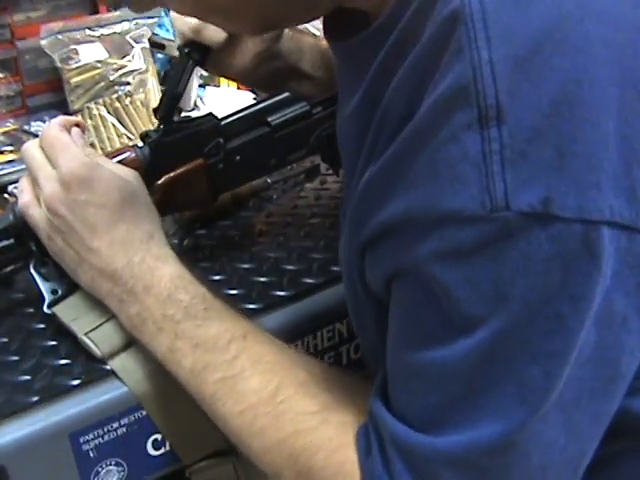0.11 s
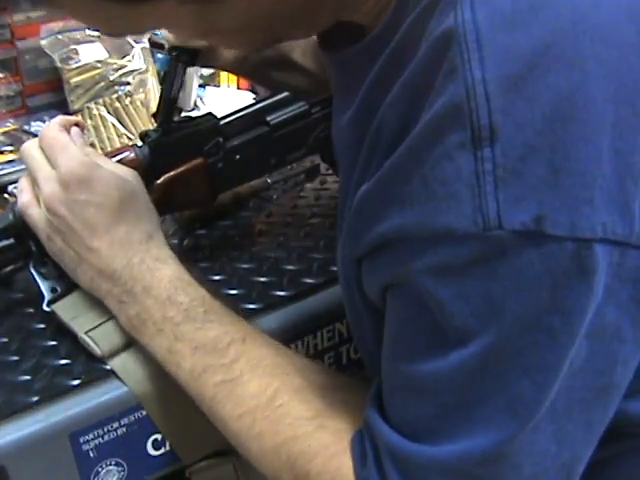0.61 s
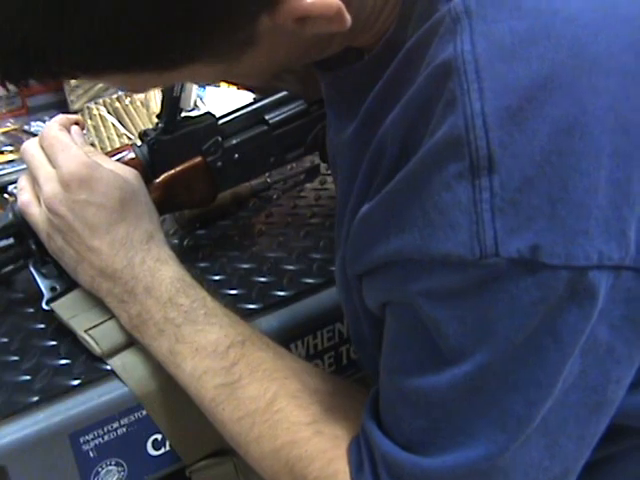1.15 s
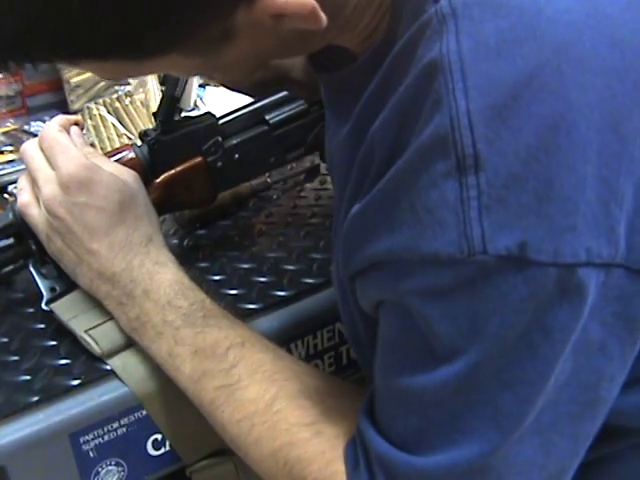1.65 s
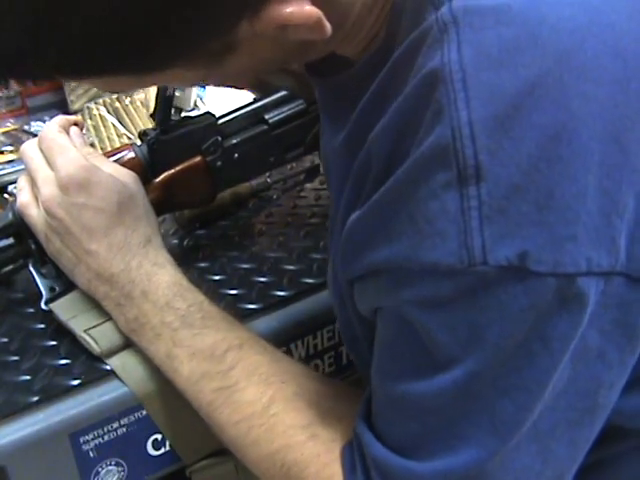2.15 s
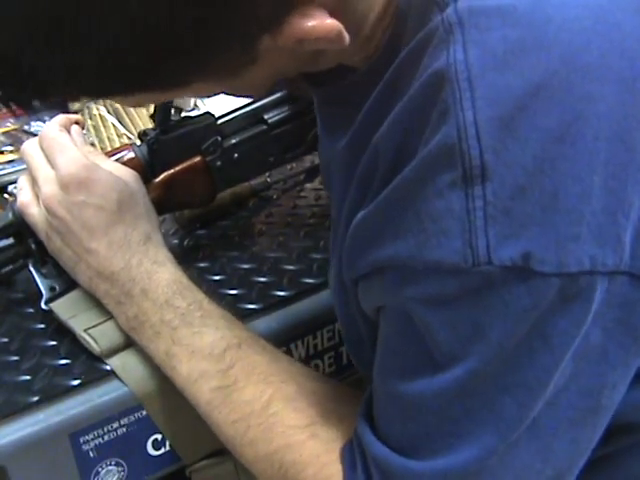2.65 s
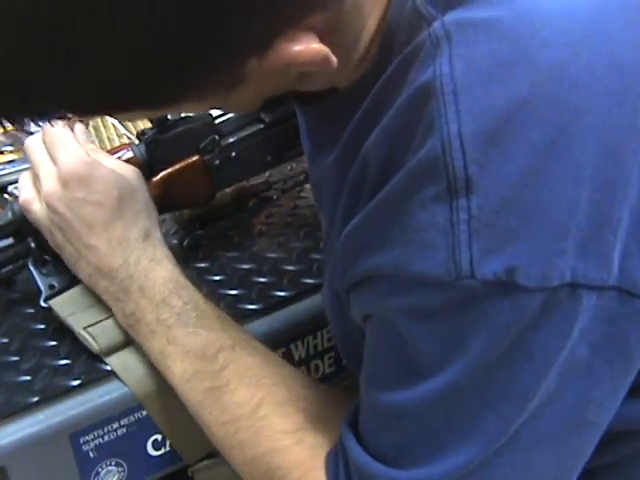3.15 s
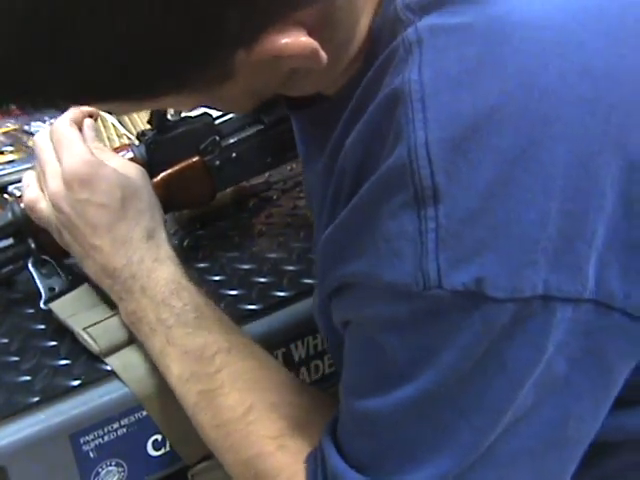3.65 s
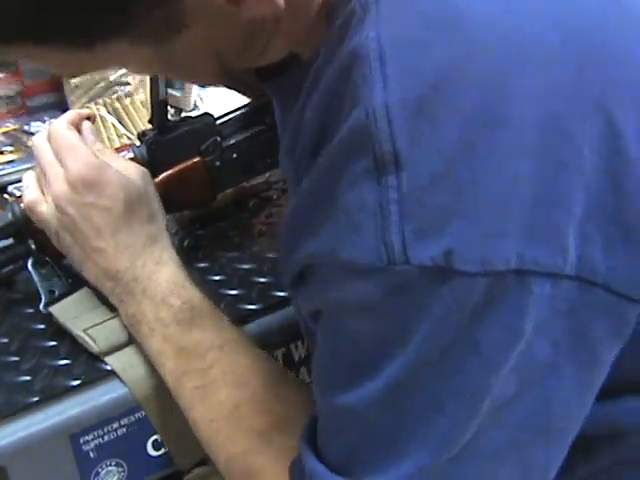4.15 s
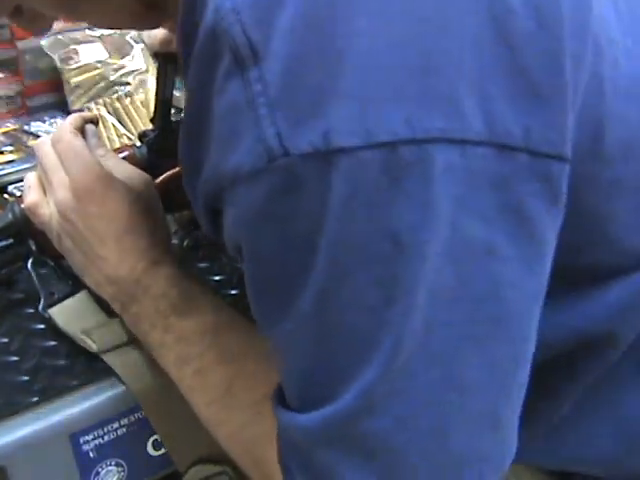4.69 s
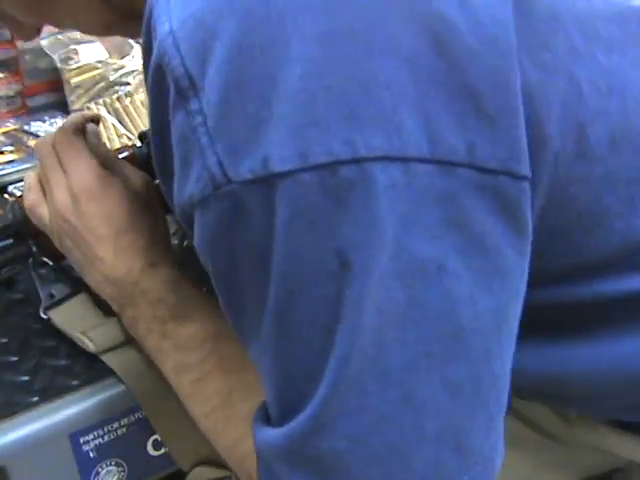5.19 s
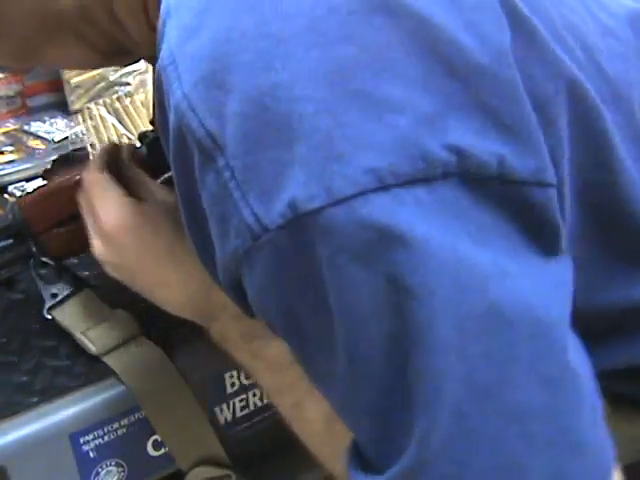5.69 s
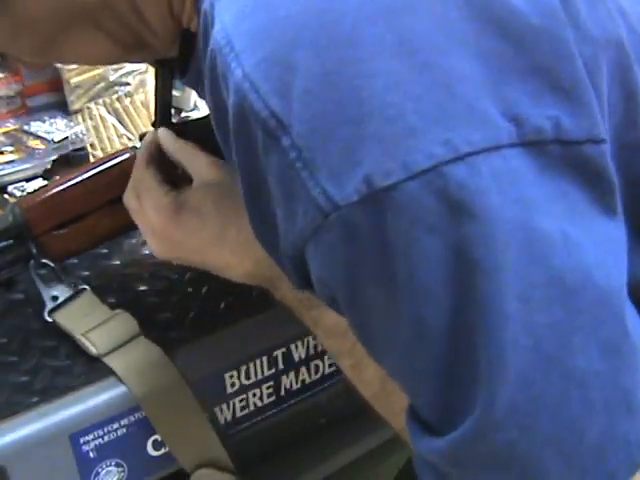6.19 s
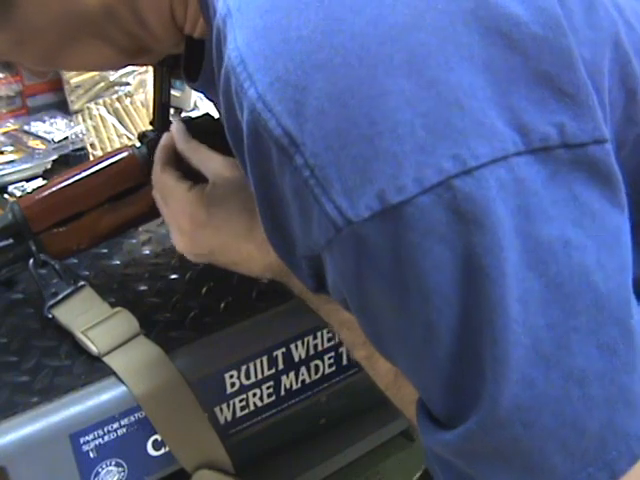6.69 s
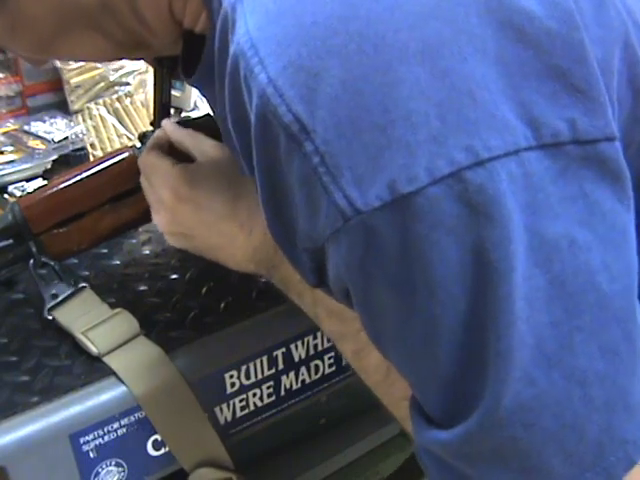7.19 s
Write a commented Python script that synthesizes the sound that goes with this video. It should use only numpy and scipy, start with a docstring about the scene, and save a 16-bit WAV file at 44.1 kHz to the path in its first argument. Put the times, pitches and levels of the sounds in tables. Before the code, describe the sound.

Small, dry metallic clicks come first, slightly left of centre, with a short squeak and bright pings. Soft scuffing nudges follow, then firmer bumps as heavy steel is slid across the bench in patchy, gritty strokes. One hard clack with fast rebounds is the loudest moment, leaving a short room tail. A few tiny clicks end it, over constant hiss, low hum and a thin early whine.

```python
"""A steel pin ticks, squeaks and scrapes in a sprung mount on a workbench: gritty noise bursts ring its damped modes,
and rough sines sound single modes as short pings and longer squeaks.
The heavy assembly is then dragged over the mat as patchy coloured noise, bumps the bench with decaying low tones
and ringing steel, and drops shut with a clack and quick rebounds. A small hard room answers with a fading noise
tail. Far off a machine hums in wavering tones beside a thin whine, over steady stereo hiss and a slow low sway."""
import sys
import numpy as np
from scipy import signal
from scipy.fft import rfft, irfft, next_fast_len
from scipy.io import wavfile
from scipy.ndimage import uniform_filter1d, map_coordinates

SR = 44100
rng = np.random.default_rng(int(sys.argv[2]) if len(sys.argv) > 2 else 0)


def to_wav(sig):
    """Store sig (one row per channel, or 1-D mono) as 16-bit WAV at the path in sys.argv[1].

    Samples outside -1..1 are clipped; the rate is SR.
    """
    pcm = np.clip(np.atleast_2d(sig), -1, 1) * 32767
    pcm = np.round(pcm).astype(np.int16)
    wavfile.write(sys.argv[1], SR, pcm.T)  # frames by channels


def invert_db(x):
    """Field ratio 10**(x/20) for x, a level in decibels (scalar or array-like)."""
    u = np.asarray(x, float) / 20
    return 10 ** u


N = 322793  # length in samples

# Steady hiss colour. Each row: frequency in Hz, relative level in dB per Hz.
HISS_COLOUR = [(15, -33), (25, -17), (76, -2), (292, -3), (343, -3.5), (529, -4.5), (984, -3), (1400, -4),
               (1830, -6), (2150, -11.5), (4840, -16.5), (5250, -16), (5700, -17), (13200, -21),
               (15900, -21)]
# Stereo likeness of the hiss. Each row: frequency in Hz, left-right likeness (1 same, 0 unrelated, -1 opposed).
HISS_LIKENESS = [(60, 1), (150, 0.7), (380, -0.53), (950, -0.75), (2380, -1.05), (5980, 0.1444),
                 (15000, 0.7)]
# Far machine tones. Each row: frequency in Hz, level in dB rms, depth of waver in dB.
MACHINE_TONES = [(84, -70, 2), (349, -76, 4.5)]
# Close tones of a thin whine. Each row: frequency in Hz, level in dB rms.
WHINE_TONES = [(5228, -82), (5268, -82), (5308, -84)]
# The slow low sway. Each row: time in seconds, level in dB.
SWAY_LEVEL = [(0, -85), (1.15, -75), (1.3, -62.5), (1.5, -70.5), (2.7, -80.5), (4.2, -69), (5.2, -66),
              (7.3, -84)]
# Decay of the room. Each row: frequency in Hz, time to fall by 60 dB in seconds.
ROOM_DECAY = [(100, 0.52), (500, 0.32), (2000, 0.36), (6000, 0.31), (14000, 0.12)]
# Stereo likeness of the room. Each row: frequency in Hz, left-right likeness.
ROOM_LIKENESS = [(60, 1), (180, 0.95), (550, 0.6), (1650, 0.3), (4970, 0.9619), (15000, 0.31)]
# Modes of the bench top. Each row: frequency in Hz, width in Hz, relative level in dB.
BENCH_MODES = [(96, 87, -10), (156, 65, 2.5), (270, 99, 1), (420, 102, 0.5), (721.28, 275, -6.5),
               (1086, 210, -11)]
# Modes of the steel assembly off the mat. Each row: frequency in Hz, width in Hz, relative level in dB.
ASSEMBLY_MODES = [(830, 57, -22), (1080, 50, 4.5), (1500, 280, -0.5), (1900, 112, 11), (2260, 150, 7.5),
                  (2524, 122, 11.5), (2900, 164, 8), (3260, 230, 6), (4080, 440, 2.5), (4260, 140, 5.5),
                  (4720, 230, -4.5), (7500, 56, 5), (6716, 83.7, -14), (8300, 64, 13), (8130, 50, 2),
                  (8600, 255, -6), (15170, 900, -18)]
# Hands, cloth and steel sliding. Each row: time in seconds, rub level in dB, bench rumble level in dB,
# treble level of the rub in dB.
DRAG_LEVELS = [(0, -56.5, -63, -35), (.3, -66.5, -66.5, -2), (2, -65, -66, -12.5), (2.6, -66, -68.5, -1.5),
               (3.46, -61.5, -66.5, -0.5), (3.95, -62, -62.5, 2), (4.11, -60, -57, 8),
               (4.24, -51, -52, 1.5), (4.32, -49, -57, 5.5), (4.4, -48.5, -59, 3), (4.55, -47.5, -59, -4.5),
               (4.73, -47, -60, -4), (4.86, -45.5, -76, -5), (5, -46, -56.5, 0.5), (5.06, -43.5, -46, -0.5),
               (5.16, -46.5, -55.5, 2), (5.26, -42, -49, -4.5), (5.35, -50, -51.5, 2.5),
               (5.45, -44.5, -65, -3), (5.51, -50, -57.5, -3.5), (5.59, -47.5, -62, -1),
               (5.72, -49.5, -59, 3), (5.87, -54.5, -61, 4), (6.18, -52.5, -62, 0), (6.25, -30, -57, 4),
               (6.35, -47, -67, -0.5), (6.42, -51, -56, 0), (6.48, -46.5, -79, 1), (6.53, -48.5, -58.5, 1),
               (6.61, -61, -62, 3), (6.86, -60.5, -64, -0.5), (7.32, -66, -64.5, 10.5)]
# Colour of the rub. Each row: frequency in Hz, relative level in dB per Hz.
RUB_COLOUR = [(180, 2.5), (300, -5.5), (612, -0.5), (798, -2.5), (1080, -0.5), (1170, -3), (1920, -1.5),
              (3730, -6), (6350, -8), (8300, -14.5), (10800, -19), (15800, -31)]
# Stereo likeness of the rub. Each row: frequency in Hz, left-right likeness.
RUB_LIKENESS = [(60, 1), (180, 0.68), (550, 0.37), (1650, 0.4), (4970, 0.85), (15000, 0.61)]
# Broad colour of a blow on the assembly. Each row: frequency in Hz, relative level in dB per Hz.
BLOW_COLOUR = [(290, -36.5), (500, -5), (829, 2.5), (972, -5.5), (2210, 1.5), (3500, -5.5), (4600, -5),
               (6000, -10), (7670, 5.5), (15800, -23)]
# Bumps on the bench. Each row: start in seconds, thud level in dB, rattle in dB over the thud, thud pitch in Hz,
# contact length in seconds, which each layer of the blow scales.
BENCH_BUMPS = [(3.675, -41.5, -23, 253, 0.0057), (3.769, -42.5, 0, 96, 0.043),
               (3.956, -49, -23, 166, 0.036), (4.098, -44, -10, 440.5, 0.054),
               (4.28, -31, -2.5, 441, 0.016), (4.428, -39.5, -3, 102, 0.03), (4.43, -44, -22, 296, 0.0063),
               (4.572, -50, 13.5, 270, 0.0085), (4.662, -34.5, 3.5, 156, 0.022), (4.7, -54, 9, 200, 0.022),
               (4.663, -37, -23, 330, 0.0074), (4.785, -63.5, 12, 226, 0.0093),
               (4.815, -41, -10, 156, 0.024), (4.816, -39.5, -13, 412.3, 0.019),
               (4.888, -34.5, 12.5, 220.9, 0.0064), (4.895, -24.5, -5, 400, 0.0094),
               (4.91, -32.5, 7, 282, 0.0091), (4.967, -37, -3.5, 156, 0.032),
               (5.099, -40, -14, 140.5, 0.067), (5.158, -46.5, 6.5, 155, 0.035),
               (5.203, -39.5, -2, 160, 0.058), (5.352, -44.5, 0.5, 136, 0.053),
               (5.675, -47, 0, 86.26, 0.033), (5.799, -47, -19, 107.3, 0.025)]
# The assembly drops shut and rebounds, steel on steel. Each row: as for the bumps.
CLACK_BLOWS = [(6.191, -18.5, 5.5, 270, 0.013), (6.202, -31, -15, 224, 0.015),
               (6.212, -19.5, -11, 180, 0.012), (6.218, -31, 15, 260, 0.0044),
               (6.233, -43, 10, 240, 0.00858), (6.247, -36.5, 11, 198, 0.023), (6.27, -44, 6, 202, 0.014),
               (6.287, -37, 4, 296, 0.013), (6.312, -48, 12, 248, 0.01962), (6.36, -49, 8, 219.3, 0.01766)]
# Pin contacts. Each row: start in seconds, level of the low modes in dB,
# then body, middle and high modes in dB over the low ones.
PIN_TICKS = [(0.2008, -39, -1, -26, -31), (0.2347, -47, 2.5, -24, -20), (0.2763, -31, -17, -11, -22),
             (0.2916, -49.5, 10, 11, -11), (0.2998, -53, -17, 13, -4), (0.31, -40.5, -4.5, -5, -20),
             (0.7384, -52.5, 4.5, -1, -8), (0.9286, -44, -19, -11.5, -19.5), (0.9363, -38, -20, 0, -16),
             (.943, -50.5, -8, 15.5, -6), (0.9492, -49, -23, 16.5, 16), (0.9555, -51.5, 9.5, 3, 18),
             (1.4607, -40, -24, 4, -10.5), (1.4714, -39.5, -1, 5, 0), (1.637, -52, -1, 8, -10),
             (1.65, -52, 5, 2.5, -10), (1.667, -48, -6, 5, -11), (1.8454, -49.5, -1, 4, 0),
             (1.8535, -42.5, 1.5, 4, -2), (1.8734, -44.5, 5.5, 10, 1), (2.1436, -43, -9, 2.5, -10),
             (2.149, -42.5, -14, 6.5, 3), (2.159, -46.5, 2.5, -2, -1), (2.215, -48.5, -3.5, 5, -1),
             (2.8868, -51.5, -8, -4, -16), (2.917, -53, -12, -5, -17), (3.0406, -52.5, -13, 1, -8),
             (3.2256, -57.5, -3, 10, -5), (3.3018, -50.5, -18, -6, -17), (3.3687, -51.5, -13, -2, -7),
             (3.477, -49.5, -11, -6, -7), (3.4988, -46, -12, -2, -7), (3.5464, -45, -15, -5, -9),
             (3.5644, -45.5, -8, -3.5, -10), (3.7184, -45.5, -10, -7, -13), (3.7675, -41.5, -8, -5.5, -14),
             (4.3993, -42, -20, -8, -8), (4.5725, -40, -4, -20, -30), (6.0306, -44, -5, -8.5, -20.5),
             (6.0603, -38, -16.5, 1.5, -22), (6.068, -46, -10, 4, -20), (6.452, -51, -12, -1, 3),
             (6.472, -52, -10, 3, 5), (6.572, -49, -18, 9, 6.5), (6.5835, -43.5, -17, 7.5, 3),
             (6.606, -51, -19, 18, 12.5), (7.0707, -49.5, -17.5, 6, -10), (7.1171, -50, -3, 15.5, 8),
             (7.1274, -54, -9, 15.5, -11), (7.2594, -39, -23, 6.5, -4), (7.2704, -63, -15, -5, -1)]
# Modes of the free pin and its mount. Each row: frequency in Hz, width in Hz, relative level in dB.
FREE_MODES = [(381, 42.78, 6), (752, 80, 8.5), (1110, 980, -4.5), (1736, 330, 4), (2260, 170, 9.5),
              (2860, 1628, 2), (3320, 95, 13.5), (3394, 150, 5), (4760, 310, 6), (5550, 87, 11),
              (5950, 82.7, 10), (6221, 4700, 3), (6770, 450, 8.5), (7240, 160, -4), (8200, 210, 7),
              (9933.2, 69, 13), (11940, 250, -3), (11900, 14000, -26.5)]
# Modes of the gripped pin, damped and shifted. Each row: frequency in Hz, width in Hz, relative level in dB.
GRIPPED_MODES = [(452, 260, -3), (900, 260, 0), (1745, 250, 8), (2462.6, 290, 0), (3740, 560, 4),
                 (4300, 1200, -2.5), (5430, 340, 3.5), (7357.7, 1178, 2), (8700, 299, 5), (9200, 1668, 0),
                 (11300, 1400, 1.5), (15000, 1214, -1.5)]
# Mode groups low, body, middle and high. First row: bottoms in Hz; second row: tops in Hz.
MODE_GROUPS = [1400, 0, 4200, 8600], [4200, 1400, 8600, 22000]
# Single pin modes sounding alone: short pings at a contact, and longer squeaks from rubs.
# Each row: start in seconds, pitch in Hz, level in dB before swell and fade, swell in seconds, fade in seconds.
SINGLE_MODES = [(.118, 3380, -42.5, .04, .027), (.201, 3150, -39, .0007, .002),
                (.125, 1760, -40.5, .036, .03), (.202, 1700, -38, .001, .0035),
                (.138, 9900, -56.5, .03, .07), (.16, 3380, -43, .003, .006), (.3, 9800, -35, .0007, .0045),
                (.94, 3280, -48, .006, .035), (.95, 14880, -43, .003, .02), (4.1, 3790, -40, .014, .015),
                (6.062, 2045, -42, .003, .022), (6.061, 4680, -45, .002, .02),
                (7.259, 1770, -42, .0031, .0021)]
# Lead of the left side over the right for near sound. Each row: frequency in Hz, phase in radians.
LEFT_LEAD = [(100, 0.1945), (500, 0.5434), (1200, 1.2), (2400, 0.78), (5000, 0.78), (9000, 0.11),
             (12000, 1.6), (16000, 1.61)]

BRIGHT_HZ = 3500  # above this the rub and the blows have a treble layer of their own


def unit(x):
    """Scales to rms 1."""
    return x / np.sqrt(np.mean(x ** 2) + 1e-20)


def along(points, hz):
    """Reads (Hz, value) points on a log frequency axis."""
    f, v = np.transpose(points)
    return np.interp(np.log(hz + 1), np.log(f + 1), v)


def curves(rows):
    """Gives one value per sample for each column after the time."""
    s, *cols = np.transpose(rows)
    return [np.interp(np.arange(N) / SR, s, c) for c in cols]


def wobble(rate):
    """Draws a smooth random curve with rate knots a second."""
    knots = rng.standard_normal(int(N * rate / SR) + 4)
    return map_coordinates(knots, [np.arange(N) * rate / SR])


def filtered(x, response):
    """Multiplies the spectrum of x by a complex response of frequency."""
    m = next_fast_len(N + SR // 2)
    return irfft(rfft(x, m) * response(np.fft.rfftfreq(m, 1 / SR)), m)[..., :N]


def ringing(modes, broad=lambda hz: 0 * hz):
    """Response of damped modes plus a broad part, passing white noise at unchanged power."""
    def response(hz):
        total = broad(hz)
        for k, (centre, width, db) in enumerate(modes):
            damping = 1j * hz * width
            # neighbouring modes swing in opposite senses
            total = total + (-1) ** k * invert_db(db) * damping / (centre ** 2 - hz ** 2 + damping)
        return total / np.sqrt(np.mean(np.abs(total) ** 2))
    return response


def spread(pair, alike):
    """Mixes two unrelated signals into left and right of the given likeness."""
    def shares(hz):
        turn = np.arccos(np.clip(along(alike, hz), -1, 1)) / 2
        return np.array([np.cos(turn), np.sin(turn)])
    mid, side = filtered(pair, shares)
    return np.array([mid + side, mid - side])


def contacts(times, levels_db, lengths, rise, grit_db):
    """Gritty noise bursts of set energy: each swells fast and dies within its contact length."""
    out, t = np.zeros(N + SR), np.arange(SR // 4) / SR
    grit = invert_db(grit_db * wobble(600)) * rng.standard_normal(N)
    grit = np.pad(grit, (0, SR), "wrap")
    for s, db, length in zip(times, levels_db, lengths):
        start = round(s * SR)
        shape = np.exp(-t / max(length, .001)) * (1 - np.exp(-t / rise))
        burst = shape * grit[start:][:len(t)]
        out[start:][:len(t)] += invert_db(db) * burst * np.linalg.norm(shape) / np.linalg.norm(burst)
    return out[:N]


def hiss():
    """Steady coloured noise, partly alike on the two sides."""
    noise = filtered(rng.standard_normal((2, N)), lambda hz: invert_db(along(HISS_COLOUR, hz)))
    return invert_db(-57.5) * unit(spread(noise, HISS_LIKENESS))


def wavering_tone(hz, level_db, phase_waver):
    """A sine whose level (dB, a number or a curve) and phase (radians) drift."""
    t = np.arange(N) / SR
    return invert_db(level_db) * np.sqrt(2) * np.sin(2 * np.pi * hz * t + phase_waver)


def machine_hum():
    """Far machine tones wander in level and phase."""
    return sum(wavering_tone(hz, db + waver_db * wobble(2.59), 2.0 * wobble(6 + hz / 60))
               for hz, db, waver_db in MACHINE_TONES)


def whine():
    """Close, slightly wavering tones die away together along a smooth slope."""
    end_s, fade_s = 4.2, .3
    tones = sum(wavering_tone(hz, db + wobble(2.8435), .5 * wobble(7.4)) for hz, db in WHINE_TONES)
    return tones / (1 + np.exp((np.arange(N) / SR - end_s) / fade_s))


def sway():
    """A slow low sway: noise through a twice-applied resonance at 34 Hz."""
    low = filtered(rng.standard_normal(N), lambda hz: ringing([(34, 22, 0)])(hz) ** 2)
    return invert_db(curves(SWAY_LEVEL)[0]) * unit(low)


def background():
    """Steady hiss, machine tones, the fading whine and the low sway."""
    return hiss() + machine_hum() + whine() + sway()


def room(x):
    """The walls answer after a few ms; each frequency dies at its own speed."""
    hz, t, z = signal.stft(rng.standard_normal((2, SR // 2)), SR, nperseg=256)
    fade = invert_db(-60 * t / along(ROOM_DECAY, hz)[:, None])
    tail = signal.istft(z * fade, SR, nperseg=256)[1]
    tail = tail / np.linalg.norm(tail[0])
    late = np.pad(x, (300, 0))[None]  # delay in samples
    wet = signal.fftconvolve(late, tail, axes=1)[:, :N]
    return spread(wet, ROOM_LIKENESS)


def bench(hz):
    """Response of the bench modes, with the deep bass cut away."""
    return ringing(BENCH_MODES)(hz) * (1j * hz / (75 + 1j * hz)) ** 2


def drag():
    """Steel, hands and cloth slide over the mat in patches; steel and bench sound along."""
    rub_db, rumble_db, treble_db = curves(DRAG_LEVELS)
    grit = invert_db(wobble(25) + 1.7 * wobble(200))
    z = signal.stft(grit * rng.standard_normal((2, N)), nperseg=512)[2]
    # blotches in time and frequency, shared by both sides
    patches = uniform_filter1d(rng.standard_normal(z.shape[1:]), size=14, axis=0)
    patches = uniform_filter1d(patches, size=9, axis=1)
    scratch = signal.istft(z * invert_db(1.48 * unit(patches)), nperseg=512)[1][:, :N]

    def colour(hz):
        low_cut = hz ** 2 / (hz ** 2 + 150 ** 2)
        return invert_db(along(RUB_COLOUR, hz)) * low_cut * (1 + 0.082 * np.abs(ringing(ASSEMBLY_MODES)(hz)))

    rub = unit(spread(filtered(scratch, colour), RUB_LIKENESS))
    treble = filtered(rub, lambda hz: hz ** 2 / (hz ** 2 + BRIGHT_HZ ** 2))
    rumble = filtered(invert_db(1.7 * wobble(25)) * rng.standard_normal(N), bench)
    return invert_db(rub_db) * (rub + (invert_db(treble_db) - 1) * treble) + invert_db(rumble_db) * unit(rumble)


def thuds(s, db, pitch_hz, length):
    """Each blow sounds a short decaying sine at its own pitch, without deep bass."""
    out, t = np.zeros(N + SR), np.arange(SR // 4) / SR
    for start, level, hz, span in zip(s, db, pitch_hz, length):
        shape = np.exp(-t / (0.74 * span + 0.00097)) * (1 - np.exp(-t / 0.0023))
        out[round(start * SR):][:len(t)] += invert_db(level) * np.sin(2 * np.pi * hz * t) * shape
    return filtered(out[:N], lambda hz: 1j * hz / (60 + 1j * hz))


def blows():
    """Bumps and clack: the bench thuds, the steel rattles and clangs; returns thud and steel."""
    mat_damps, knock_db = 2.37, -2  # on the mat the modes are this much wider; level of the broad knock
    s, db, rattle_db, pitch_hz, length = np.vstack([BENCH_BUMPS, CLACK_BLOWS]).T
    bump = s < CLACK_BLOWS[0][0]
    # clang in dB over the thud: longer, sliding bumps clang more, later rebounds less
    bump_clang_db = -46 + 542 * length
    clack_clang_db = 3 - 60 * np.maximum(s - CLACK_BLOWS[2][0], 0)
    clang_db = np.where(bump, bump_clang_db, clack_clang_db)
    wood = filtered(contacts(s, db - 5, 0.65 * length, rise=0.00035, grit_db=-4.0), bench)

    dull = lambda hz: 1 / (1 + 1j * hz / BRIGHT_HZ) ** 2
    free = ringing(ASSEMBLY_MODES, lambda hz: invert_db(along(BLOW_COLOUR, hz) - 1.0))
    damped_modes = [(hz, mat_damps * width, level) for hz, width, level in ASSEMBLY_MODES]
    damped = ringing(damped_modes, lambda hz: invert_db(along(BLOW_COLOUR, hz) + knock_db))

    rattle = 0
    for rows, body, low_hz in ((bump, damped, 500), (~bump, free, 900)):
        push = contacts(s[rows], (db + rattle_db)[rows], 0.79 * length[rows], rise=0.00074, grit_db=7.5)
        rattle = rattle + filtered(push, lambda hz: body(hz) * dull(hz) * 1j * hz / (low_hz + 1j * hz))
    push = contacts(s, db + clang_db, length, rise=0.0022, grit_db=4.0)
    clang = filtered(push, lambda hz: damped(hz) * (1 - dull(hz)))
    return thuds(s, db, pitch_hz, length) + wood, rattle + clang


def pings_and_squeaks():
    """Single pin modes sound alone, pinged at a contact or squeaking from a rub, rough in level and phase."""
    out, t = np.zeros(N + SR), np.arange(SR // 4) / SR
    for s, hz, db, swell, fade in SINGLE_MODES:
        rough = uniform_filter1d(rng.standard_normal((2, len(t))), size=110, axis=1) * np.sqrt(110)
        tone = invert_db(db + 3 * rough[0]) * np.sqrt(2) * np.sin(2 * np.pi * hz * t + .75 * rough[1])
        out[round(s * SR):][:len(t)] += tone * (1 - np.exp(-t / swell)) * np.exp(-t / fade)
    return out[:N]


def scrape(count=5):
    """The pin scrapes in, slipping ever harder at uneven gaps; rows like the ticks."""
    way = (np.arange(count) + rng.uniform(-.3, .3, count)) / (count - 1)
    start_s = 0.129 + way * (.178 - 0.129)
    level_db = -53 + way * (-48 - -53)
    shares_db = np.tile((-5, -6, -22), (count, 1))  # body, middle and high modes over the low ones
    return np.column_stack([start_s, level_db, shares_db])


def pin():
    """Each contact shakes every mode group by its share; gripped, soft nudges scuff and firm ones click."""
    gripped_s, firm_s = 2.4, 3.75  # fingers nudge the pin softly from the first, firmly from the second
    s, db, body, middle, high = np.vstack([PIN_TICKS, scrape()]).T
    free, firm = s < gripped_s, s >= firm_s
    # modes, which contacts, contact length and rise in seconds
    touches = ((FREE_MODES, free, 0.0074, 0.0019),
               (GRIPPED_MODES, firm, 0.0052, 0.00039),
               (GRIPPED_MODES, ~free & ~firm, 0.0095, 0.0015))
    out = pings_and_squeaks()
    for modes, rows, length, rise in touches:
        for low, top, share in zip(*MODE_GROUPS, [0 * db, body, middle, high]):
            group = ringing([m for m in modes if low <= m[0] < top])
            push = contacts(s[rows], (db + share)[rows], length + 0 * s[rows], rise, grit_db=1.5)
            out += filtered(push, lambda hz: group(hz) / (1 + 1j * hz / (0.92 * top)) ** 2)
    return out


def scene():
    """The pin sits a little left, the assembly just right of the middle; each feeds the room by its own share."""
    ticks, (thud, steel) = pin(), blows()
    near = ticks * invert_db([[1.2], [-1.2]]) + (thud + steel) * invert_db([[-.4], [.4]])
    near = filtered(near, lambda hz: np.exp(.5j * along(LEFT_LEAD, hz) * [[1], [-1]]))
    answer = room(invert_db(-8.5) * ticks + invert_db(-3.5) * steel + invert_db(-6) * thud)
    return near + answer + drag() + background()


def band_limit(x):
    """A steep low-pass at the top of the band."""
    return signal.sosfilt(signal.butter(12, 17000, fs=SR, output="sos"), x)


def record(dry):
    """Cuts everything from 15.8 kHz up and finishes the mix."""
    mix = filtered(dry, lambda hz: hz < 15800)
    return band_limit(mix)


dry = scene()
out = record(dry)
to_wav(out)
```